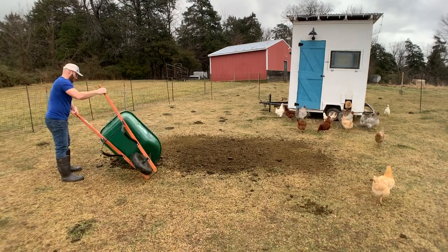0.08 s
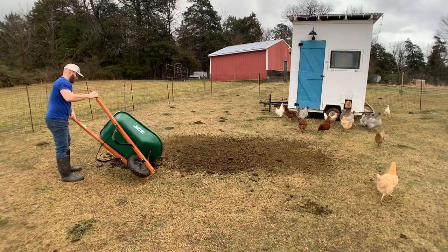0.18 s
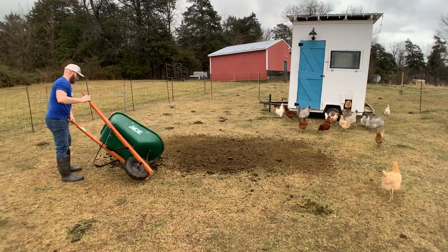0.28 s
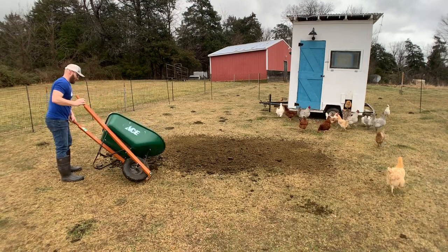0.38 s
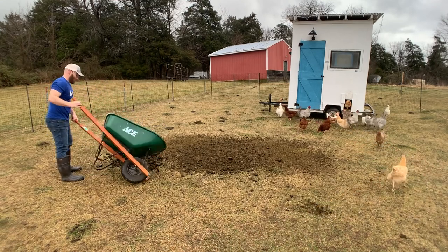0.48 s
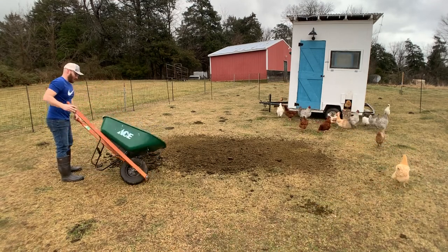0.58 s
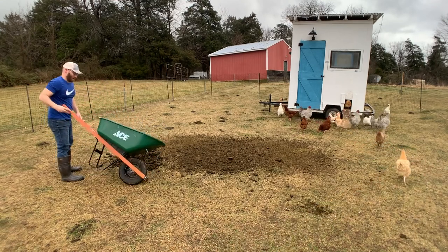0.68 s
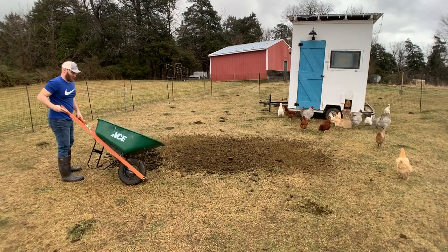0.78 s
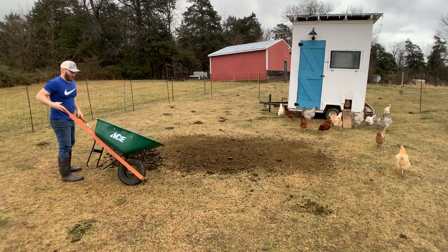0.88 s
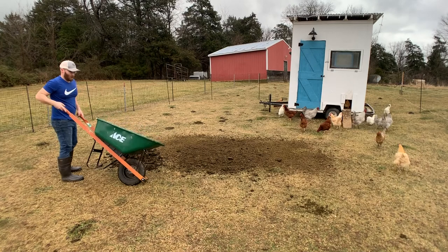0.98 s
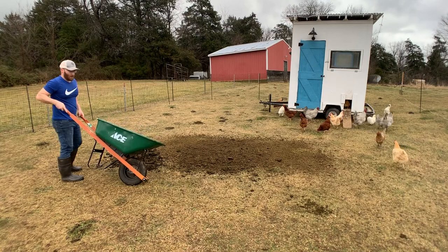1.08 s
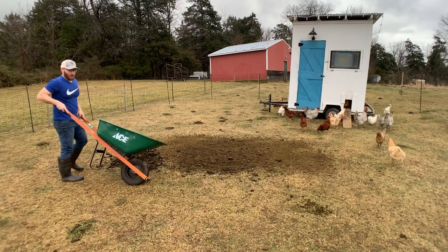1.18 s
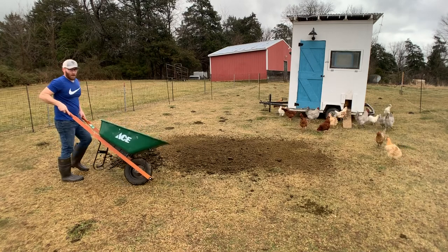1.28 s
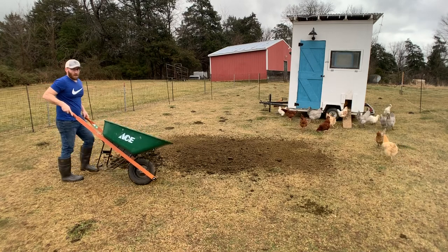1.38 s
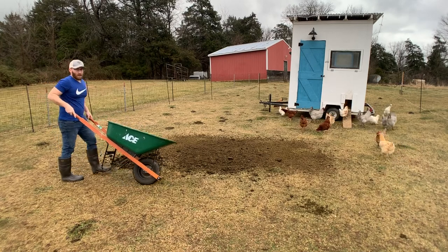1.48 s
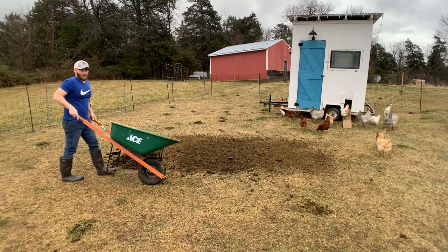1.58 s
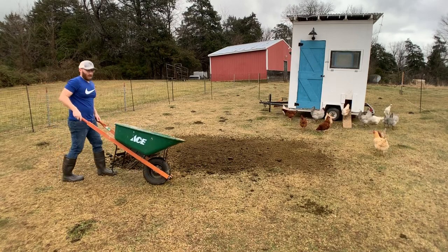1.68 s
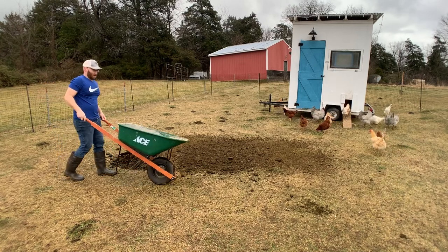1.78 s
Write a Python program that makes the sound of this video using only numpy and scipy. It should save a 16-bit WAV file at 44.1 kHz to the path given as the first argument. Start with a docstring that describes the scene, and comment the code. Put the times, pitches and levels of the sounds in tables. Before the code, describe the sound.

Empty metal wheelbarrow drops onto its legs with a hollow clanging thud, rattles, then knocks once more

```python
"""Open farm yard: an empty steel wheelbarrow drops onto its legs, shudders, and is knocked once more.
Each blow sums a gliding knock, a noise crack, ringing tray modes and a spray of grit; between blows,
random taps on short modes make the loose joints rattle. Small birds chirp in gliding sines, a hen clucks
once in harmonics, boots brush the grass in band-passed grains, far traffic and wind rumble as noise."""
import sys
import numpy as np
from scipy import signal
from scipy.fft import rfft, irfft
from scipy.io import wavfile
from scipy.ndimage import uniform_filter1d

SR = 44100
rng = np.random.default_rng(int(sys.argv[2]) if len(sys.argv) > 2 else 0)


def bounce(signal):
    """Save signal as a 16-bit WAV file at the path given by the first command-line argument."""
    frames = np.transpose(np.atleast_2d(signal))
    limited = np.clip(frames, -1, 1)
    pcm = np.round(limited * 32767).astype(np.int16)
    wavfile.write(sys.argv[1], SR, pcm)


def volts_from_db(level):
    """Convert decibel levels to linear amplitude ratios."""
    exponent = np.asarray(level, float) / 20
    return 10 ** exponent


N = 79380

# Yard noise spectrum: (frequency [Hz], relative density [dB per Hz])
AIR_SPECTRUM = [(30, -14.5), (65, 4.5), (125, -4.5), (300, -21.5), (850, -14.5), (1400, -27), (2700, -39.5),
                (3700, -38.5), (7000, -41), (8500, -59.5), (10500, -41), (13000, -51.5), (15300, -45),
                (16600, -58)]
# Yard noise stereo width: (frequency [Hz], left-right correlation [0..1])
AIR_CORRELATION = [(30, 0.85), (300, 0.83), (1000, 0.057), (4000, 0.033)]
# Brushes of the grass: (centre time [s], length [s], level [dB], band centre [Hz], band width [Hz])
GRASS_RUSTLES = [(0.127, 0.012, -63, 6650, 1520), (1.627, 0.0074, -73.5, 5000, 2930),
                 (1.701, 0.03, -67.5, 3370, 4730), (1.777, 0.26, -76.5, 4400, 2500)]
# Bird calls: (start [s], length [s], level [dB], from [Hz], to [Hz], mid-call arch [Hz])
CHIRPS = [(0.13, 0.056, -75.5, 4400, 3270, 111), (.80, 0.065, -76.5, 3240, 3580, -4),
          (0.944, 0.027, -82, 4200, 4460, 144), (1.225, 0.022, -80.5, 4540, 4500, -12),
          (1.279, 0.048, -70.5, 3400, 3160, 426), (1.31, 0.026, -85, 4200, 3830, 95),
          (1.516, 0.046, -70.5, 3680, 3240, 250), (1.52, 0.039, -74, 4000, 4010, 151)]
# Hen's pitch and level: (time [s], fundamental [Hz], level [dB])
CLUCK = [(1.105, 272.3, -50), (1.125, 265, -52), (1.14, 241, -40), (1.158, 251, -51), (1.172, 258, -58)]
# Hen's harmonics: (multiple of fundamental, level [dB])
CLUCK_HARMONICS = [(1, -12), (2, -7.5), (3, -14)]
# Shudder of the frame: (time [s], rattle level [dB], boom level [dB], grit level [dB])
SHUDDER = [(.206, -24.5, -26, -52), (.25, -28.5, -24, -43.5), (.36, -30.5, -36.5, -56),
           (.46, -44, -30.5, -64), (.55, -52.5, -41.5, -75.5), (.625, -62.5, -45.5, -79),
           (.64, -44, -39, -56.5), (.68, -40, -43, -76), (.70, -35.5, -40.5, -67.5),
           (.80, -52.5, -37.5, -83.5), (.92, -65, -53.5, -101), (1.06, -93, -51, -102)]
# Rattle spectrum: (frequency [Hz], relative density [dB per Hz])
RATTLE_SPECTRUM = [(220, 8), (400, 4), (750, 2), (1100, -6), (1500, -18.5), (3000, -32)]
# Grit spectrum: (frequency [Hz], relative density [dB per Hz])
GRIT_SPECTRUM = [(900, -7), (2100, 14), (3400, 2.5), (4600, 14.5), (6400, 11), (8600, -13), (10400, 10),
                 (13000, -30.5), (15300, 2), (16500, -74)]
# Blows: (time [s], tray level [dB], knock level [dB], settled knock pitch [Hz], grit level [dB])
BLOWS = [(0.2070, -33.5, -15.5, 760, -32.5), (.2102, -40, -12.5, 247, -50), (0.2122, -36, -14.5, 730, -56),
         (0.2193, -41, -12, 104.4, -28), (.2590, -35, -32, 900, -36.5), (.2920, -35, -19.5, 736, -38.5),
         (0.33, -39, -14.5, 174, -36), (.3470, -32, -31, 430, -44), (.3750, -45, -28.5, 754, -62),
         (0.633, -51.5, -38, 1115, -52), (.6843, -39, -13, 504, -41), (0.6861, -40.5, -18, 309, -70)]
# Tray modes: (frequency [Hz], relative level [dB], T60 [s])
TRAY_MODES = [(87, -2, .7), (108, 6, .25), (128, -4, .4), (167, 2, .35), (190, -2, .5), (268, 0, .2),
              (312, -7, .5), (386, -6, .6), (480, -9, .4), (587, -11, .5), (678, -10, .3), (778, -5, .12),
              (921, -9, .12)]
# Thin rim modes set ringing by the grit: (frequency [Hz], relative level [dB], T60 [s])
RIM_MODES = [(5360, -14, .04), (6406, -14, .07)]
# Barrow level between ports: (frequency [Hz], left minus right [dB])
PORT_BALANCE = [(250, 0), (700, 7), (1300, -1.5), (15000, -.6)]
# Barrow phase between ports: (frequency [Hz], left lead [rad])
PORT_PHASE = [(0, 0), (1030, -.3), (2760, 2.6), (6900, 5.0), (10200, 9.0), (16400, 14.0)]

AIR_DB = -57
CHIRP_WOBBLE_HZ, CHIRP_FLUTTER_DB = 45, 2.5
CHIRP_ECHO_S, CHIRP_ECHO_DB = .014, -11
GRAIN_SPREAD_DB = 2.5
RATTLES_PER_S, RATTLE_T60_CYCLES, BOOM_T60_CYCLES = 1500, 65, 21.7
DULLING_DB_PER_OCTAVE = 0.21  # for each dB that the rattle fades
GRIT_GRAINS_PER_S, GRIT_HISS = 1800, .5
TRICKLE_CUT_HZ, BASS_CUT_HZ = 8000, 63
CONTACT_HZ = 900
KNOCK_CYCLES = 4.68  # the decay factor falls by exp(-2 pi) over these
KNOCK_SAG, KNOCK_SAG_CYCLES = 0.96, 0.24  # starts sharp by this share, then settles
CRACK_DB, CRACK_LOW_HZ, CRACK_HIGH_HZ = -31, 800, 2600  # level relative to the knock
BURST_RISE_S, CRACK_T60_S, GRIT_T60_S = .0005, .018, .028
SCATTER_DB, SCATTER_T60_S, SCATTER_ABOVE_HZ = -4, 0.028, 900


def rms_one(x):
    """Scale to rms 1."""
    return x / np.sqrt(np.mean(x ** 2) + 1e-20)


def filtered(x, order, hz, kind="low"):
    """Butterworth filter."""
    return signal.sosfilt(signal.butter(order, hz, kind, fs=SR, output="sos"), x)


def in_time(rows, outside=None):
    """Interpolate curve columns at every sample."""
    s, *columns = np.transpose(rows)
    return [np.interp(np.arange(N) / SR, s, c, left=outside, right=outside) for c in columns]


def at_hz(points, hz):
    """Read a spectrum table on a log frequency axis."""
    p = np.array(points, float)
    return np.interp(np.log(hz + 1), np.log(p[:, 0] + 1), p[:, 1])


def coloured(x, gain):
    """Filter by a gain for each frequency."""
    hz = np.arange(N + 1) * SR / (2 * N)
    return irfft(rfft(x, 2 * N) * gain(hz), 2 * N)[..., :N]


def drift(corner_hz):
    """Random drift of spread 1: noise through two equal poles, run at SR / 40."""
    r = np.exp(-2 * np.pi * corner_hz * 40 / SR)
    noise = rng.standard_normal(N // 40 + 2002)
    slow = signal.lfilter([1], [1, -2 * r, r * r], noise)[2000:]
    return np.interp(np.arange(N) / 40, np.arange(len(slow)), rms_one(slow))


def ring(clicks, hz, t60_s):
    """Two-pole resonator: a unit click starts a decaying sine of height 1."""
    r = volts_from_db(-60 / (t60_s * SR))
    w = 2 * np.pi * hz / SR
    return signal.lfilter([0, np.sin(w)], [1, -2 * r * np.cos(w), r * r], clicks + 1e-18)


def burst(clicks, t60_s):
    """Envelope that rises fast at each click and dies exponentially."""
    rise = np.exp(-1 / (BURST_RISE_S * SR))
    poles = np.convolve([1, -rise], [1, -volts_from_db(-60 / (t60_s * SR))])
    return signal.lfilter([1 - rise], poles, clicks + 1e-18)


def grains(per_s):
    """Random clicks of uneven size and either sign."""
    sizes = volts_from_db(GRAIN_SPREAD_DB * np.minimum(rng.exponential(1, N), 5))
    return sizes * rng.choice([-1, 1], N) * (rng.random(N) < per_s / SR)


def air(patchy_db):
    """Far traffic and wind: partly correlated stereo noise whose rumble comes in lumps."""
    def correlation(hz):
        return np.clip(at_hz(AIR_CORRELATION, hz), 0, 1)

    mid, side = rng.standard_normal((2, N))
    mid = coloured(mid, lambda hz: volts_from_db(at_hz(AIR_SPECTRUM, hz)) * np.sqrt(1 + correlation(hz)))
    side = coloured(side, lambda hz: volts_from_db(at_hz(AIR_SPECTRUM, hz)) * np.sqrt(1 - correlation(hz)))
    both = rms_one(np.array([mid + side, mid - side]))
    low = signal.sosfiltfilt(signal.butter(2, 250, fs=SR, output="sos"), both)
    rumble = low * volts_from_db(patchy_db * drift(2.7))
    rest = (both - low) * volts_from_db(0.69 * drift(0.51))
    return volts_from_db(AIR_DB) * (rumble + rest)


def rustles():
    """Boots on grass: short Gaussian swells of band-passed grains, independent left and right."""
    t, out = np.arange(N) / SR, 0
    grainy = np.array([rms_one(grains(3300)), rms_one(grains(3100))])
    for s, length_s, db, hz, width_hz in GRASS_RUSTLES:
        band = filtered(grainy, 2, [hz - width_hz / 2, hz + width_hz / 2], "band")
        swell = np.exp(-((t - s) * 2 / length_s) ** 2)
        out = out + volts_from_db(db) * swell * rms_one(band)
    return out


def birds():
    """Near sines that glide, arch and waver, with one echo."""
    out, wobble = np.zeros(N), drift(160.0)
    for s, length_s, db, from_hz, to_hz, arch_hz in CHIRPS:
        u = np.arange(int(length_s * SR)) / (length_s * SR)
        span = slice(int(s * SR), int(s * SR) + len(u))
        arch = np.sin(np.pi * u)
        hz = from_hz + (to_hz - from_hz) * u + arch_hz * arch + CHIRP_WOBBLE_HZ * wobble[span]
        out[span] += volts_from_db(db) * arch ** .5 * np.sin(2 * np.pi * np.cumsum(hz) / SR)
    out = out * volts_from_db(CHIRP_FLUTTER_DB * drift(159.0))
    return out + volts_from_db(CHIRP_ECHO_DB) * np.roll(out, int(CHIRP_ECHO_S * SR))


def hen():
    """One soft, clean cluck: harmonics of a gliding fundamental."""
    hz, db = in_time(CLUCK)
    on = in_time([(CLUCK[0][0], 1), (CLUCK[-1][0], 1)], outside=0)[0]
    gate = uniform_filter1d(on, size=400)
    phase = 2 * np.pi * np.cumsum(hz) / SR
    return gate * volts_from_db(db) * sum(volts_from_db(d) * np.cos(k * phase) for k, d in CLUCK_HARMONICS)


def shudder(spray):
    """Loose joints tap short tray modes, low modes are shaken by noise, grit sprays and trickles."""
    rattle_db, boom_db, grit_db = in_time(SHUDDER, outside=-120)
    taps = grains(RATTLES_PER_S)
    mode_hit = rng.integers(0, 30, N)  # each tap strikes one mode
    fade_db = rattle_db - rattle_db.max()
    rattle = np.zeros(N)
    for k, hz in enumerate(np.geomspace(240, 3000, 30)):
        tilt_db = DULLING_DB_PER_OCTAVE * fade_db * np.log2(hz / CONTACT_HZ * 2)
        gain = volts_from_db(at_hz(RATTLE_SPECTRUM, hz) + tilt_db) * hz
        rattle += gain * ring(taps * (mode_hit == k), hz, RATTLE_T60_CYCLES / hz)
    rattle = rattle / np.std(rattle[rattle_db > -99])

    boom = np.zeros(N)
    for hz, db, _ in TRAY_MODES[:6]:
        boom += volts_from_db(db) * rms_one(ring(rng.standard_normal(N), hz, BOOM_T60_CYCLES / hz))

    grit = rms_one(grains(GRIT_GRAINS_PER_S)) + GRIT_HISS * rng.standard_normal(N)
    grit = coloured(grit, lambda hz: volts_from_db(at_hz(GRIT_SPECTRUM, hz)))
    trickle = volts_from_db(grit_db + 3.0 * drift(82.0)) * rms_one(filtered(grit, 4, TRICKLE_CUT_HZ))
    return volts_from_db(rattle_db) * rattle + volts_from_db(boom_db) * rms_one(boom) + spray * rms_one(grit) + trickle


def blows():
    """Each blow knocks, cracks, rings tray modes at random strengths and throws grit at the rim."""
    s, tray_db, knock_db, knock_hz, grit_db = np.transpose(BLOWS)
    at = (s * SR).astype(int)
    chance_db = rng.normal(0, 3.3, (len(s), len(TRAY_MODES)))
    tray, knocks, crack, grit_clicks = np.zeros((4, N))
    for k, (hz, db, t60_s) in enumerate(TRAY_MODES):
        clicks = np.zeros(N)
        clicks[at] = volts_from_db(tray_db + db + chance_db[:, k]) * (-1) ** k
        tray += ring(clicks, hz, t60_s)
    tray = filtered(tray, 2, CONTACT_HZ)

    t = np.arange(6000) / SR
    for i, db, hz in zip(at, knock_db, knock_hz):
        u = t * hz * 2 * np.pi / KNOCK_CYCLES
        envelope = np.e * u * np.exp(-u)  # peaks at 1
        turns = hz * t + KNOCK_SAG * KNOCK_SAG_CYCLES * (1 - np.exp(-hz * t / KNOCK_SAG_CYCLES))
        knocks[i:i + len(t)] += volts_from_db(db) * envelope * np.sin(2 * np.pi * turns)

    crack[at] = volts_from_db(knock_db + CRACK_DB)
    noise = filtered(rng.standard_normal(N), 2, [CRACK_LOW_HZ, CRACK_HIGH_HZ], "band")
    crack = burst(crack, CRACK_T60_S) * rms_one(noise)

    grit_clicks[at] = volts_from_db(grit_db)
    rim = sum(ring(volts_from_db(db) * grit_clicks, hz, t60_s) for hz, db, t60_s in RIM_MODES)
    return tray + knocks + crack + rim, burst(grit_clicks, GRIT_T60_S)


def two_ports(x):
    """Two microphone ports hear the barrow at unlike level and phase, with unlike near reflections."""
    def half(hz):
        phase = np.interp(hz, *np.transpose(PORT_PHASE))
        return volts_from_db(at_hz(PORT_BALANCE, hz) / 2) * np.exp(.5j * phase)

    decay = volts_from_db(-60 * np.arange(2048) / (SCATTER_T60_S * SR))
    tails = rng.standard_normal((2, 2048)) * decay
    bright = filtered(x, 1, SCATTER_ABOVE_HZ, "high")
    scatter = [volts_from_db(SCATTER_DB) * signal.fftconvolve(bright, tail / np.linalg.norm(tail))[:N]
               for tail in tails]
    direct = np.array([coloured(x, half), coloured(x, lambda hz: 1 / half(hz))])
    return direct + scatter


def scene():
    """Sum air, grass, birds, hen and barrow in stereo."""
    struck, spray = blows()
    barrow = filtered(struck + shudder(spray), 2, BASS_CUT_HZ, "high")
    chirps = birds() * volts_from_db(np.array([[-1.5], [1.5]]))  # left, right dB
    return air(patchy_db=2.5) + rustles() + chirps + hen() + two_ports(barrow)


def top_cut(x):
    """Nothing passes above the cut-off."""
    return signal.sosfilt(signal.butter(12, 16810, fs=SR, output="sos"), x)


def record(dry):
    """Return the finished stereo mix as it is heard."""
    return top_cut(dry)


dry = scene()
out = record(dry)
bounce(out)
```